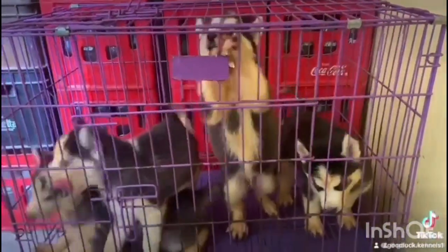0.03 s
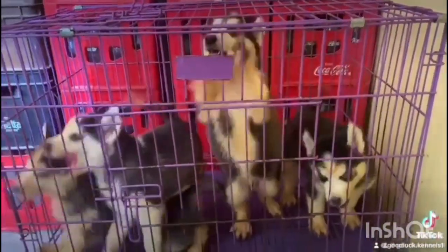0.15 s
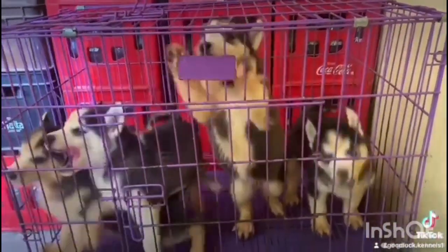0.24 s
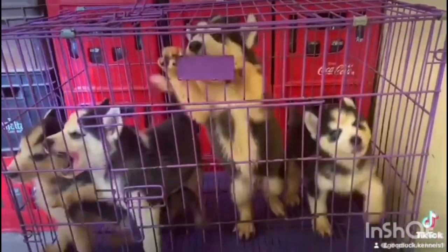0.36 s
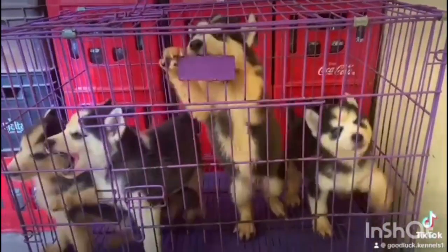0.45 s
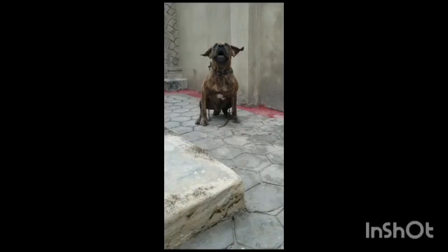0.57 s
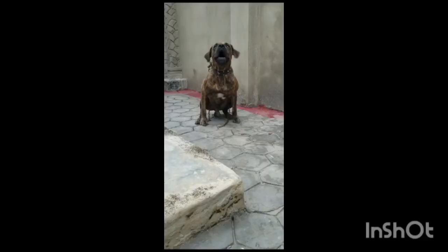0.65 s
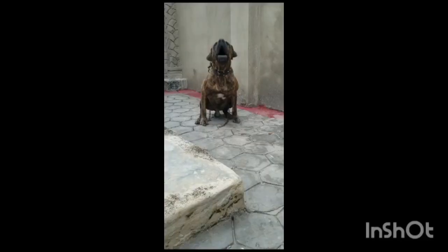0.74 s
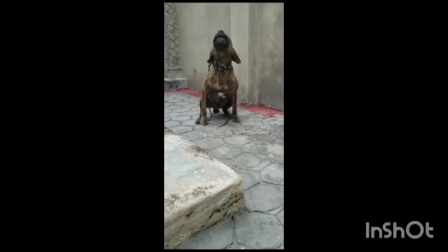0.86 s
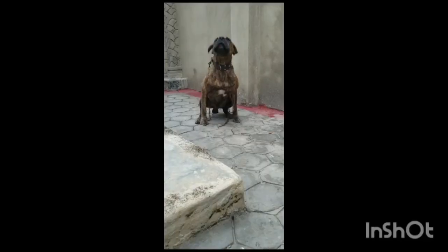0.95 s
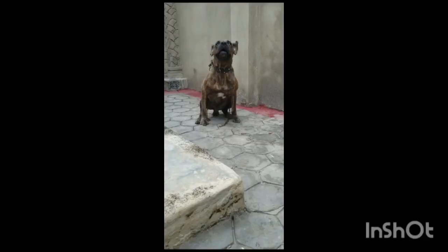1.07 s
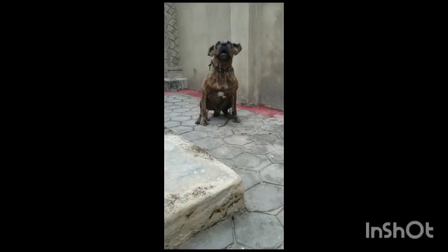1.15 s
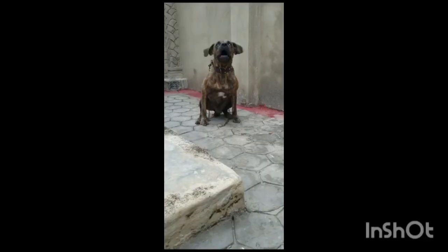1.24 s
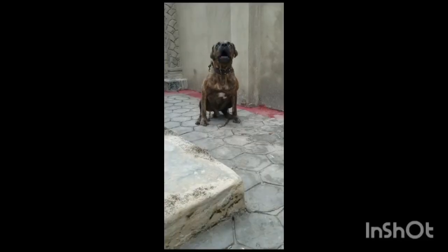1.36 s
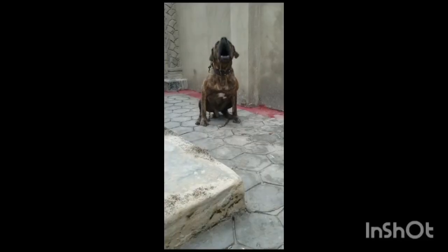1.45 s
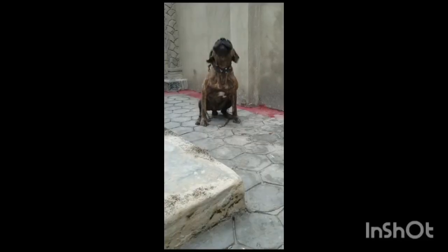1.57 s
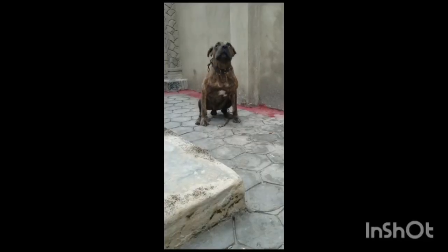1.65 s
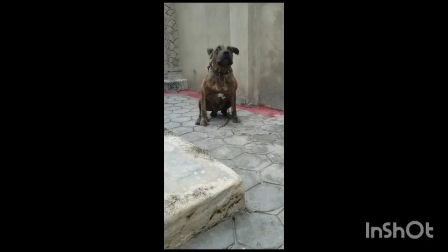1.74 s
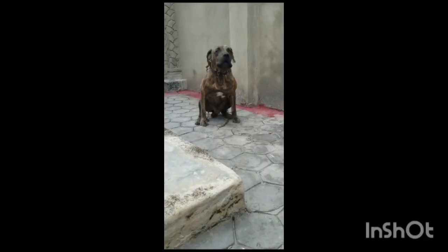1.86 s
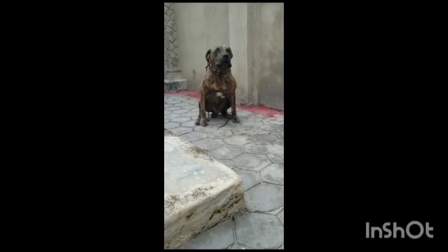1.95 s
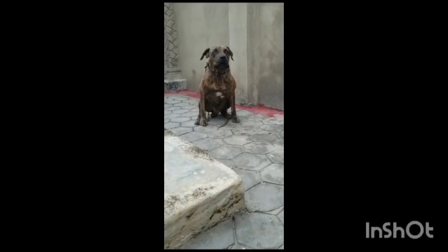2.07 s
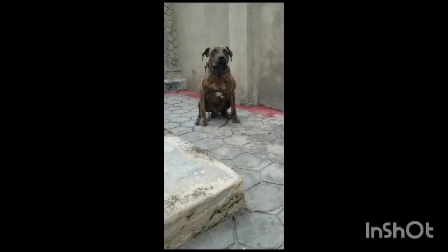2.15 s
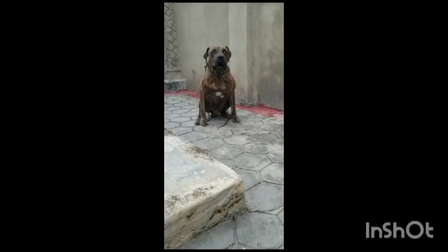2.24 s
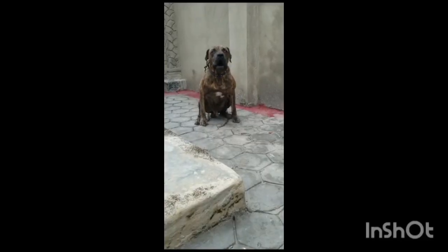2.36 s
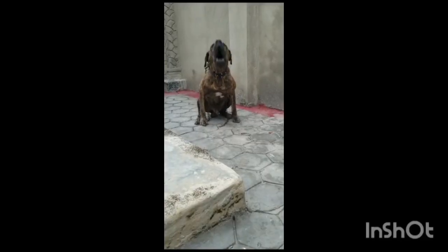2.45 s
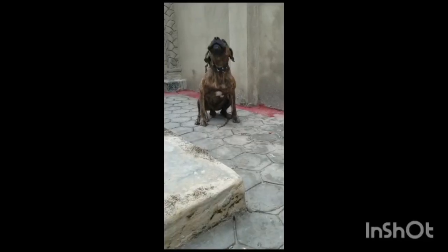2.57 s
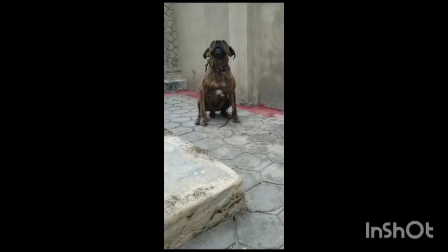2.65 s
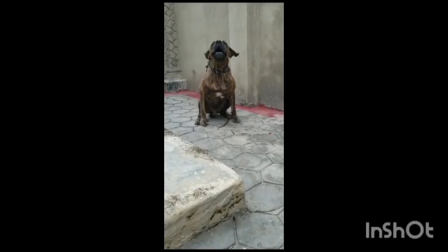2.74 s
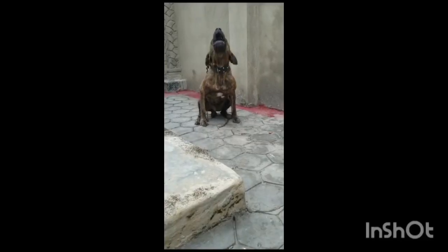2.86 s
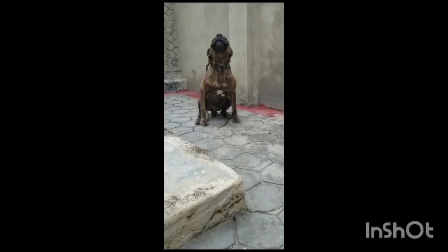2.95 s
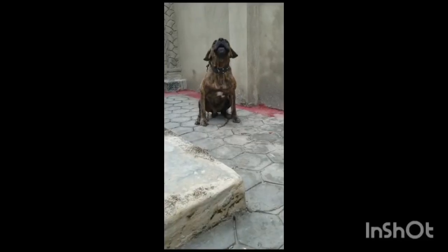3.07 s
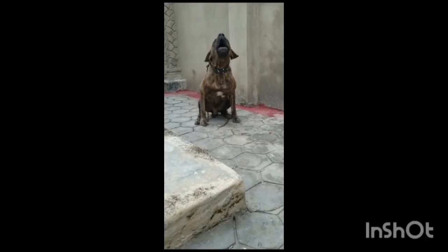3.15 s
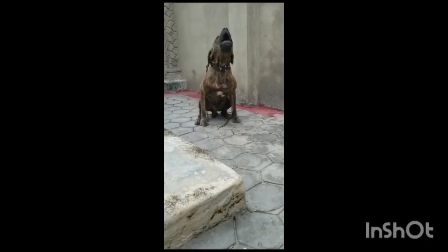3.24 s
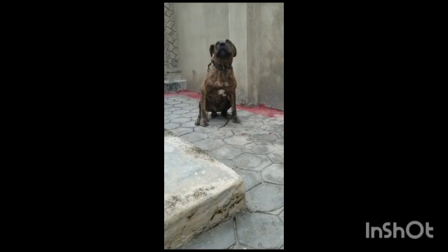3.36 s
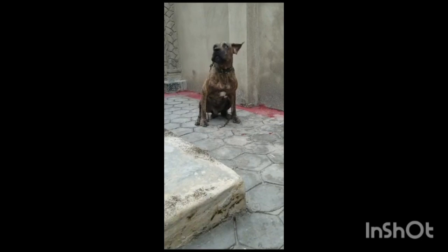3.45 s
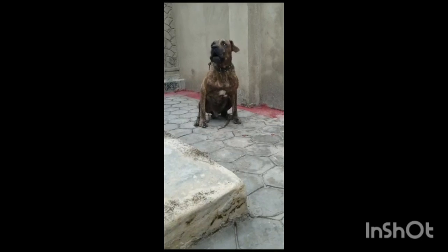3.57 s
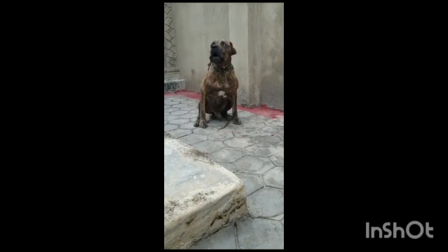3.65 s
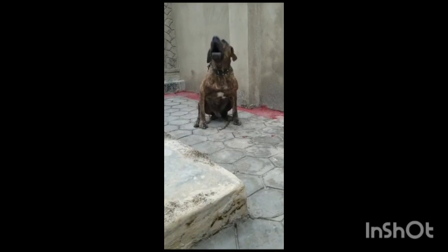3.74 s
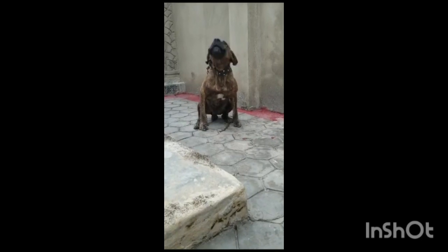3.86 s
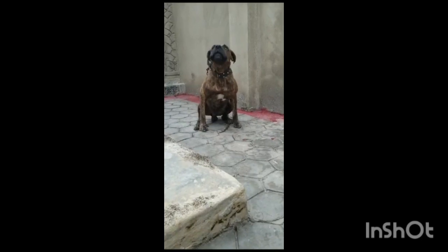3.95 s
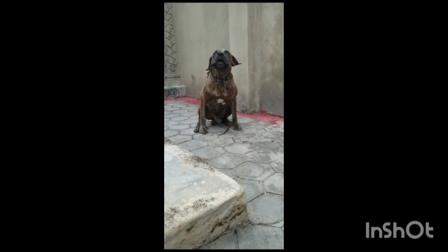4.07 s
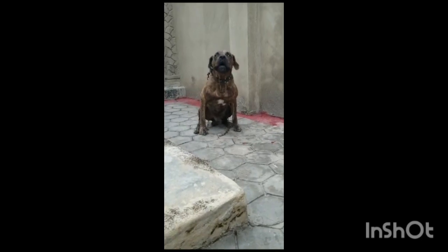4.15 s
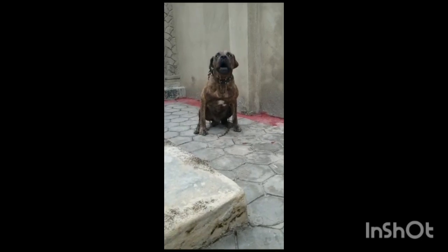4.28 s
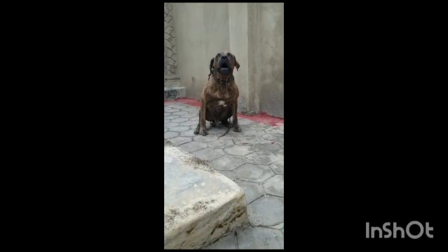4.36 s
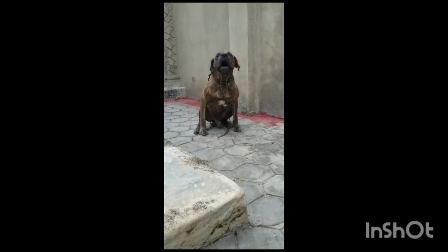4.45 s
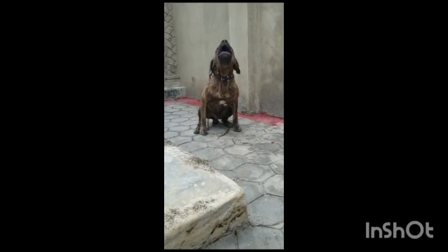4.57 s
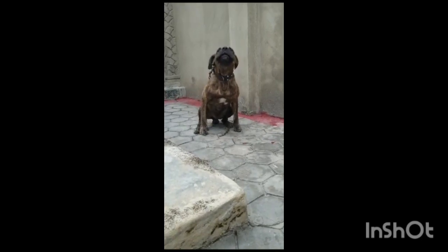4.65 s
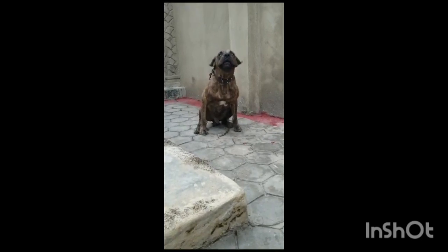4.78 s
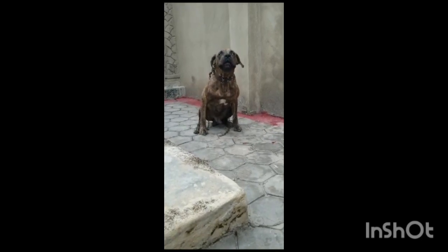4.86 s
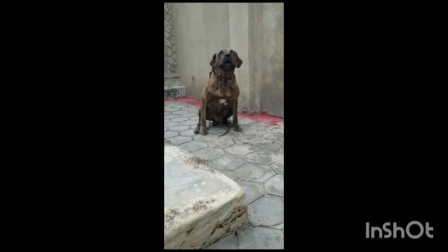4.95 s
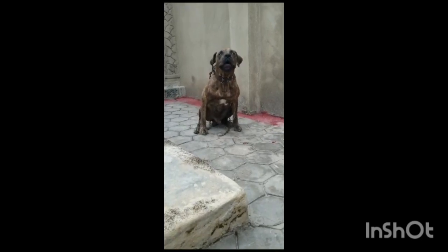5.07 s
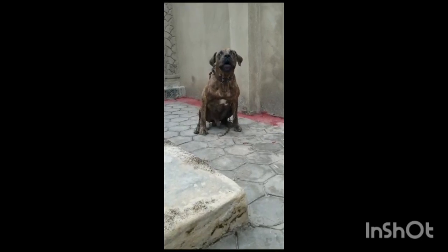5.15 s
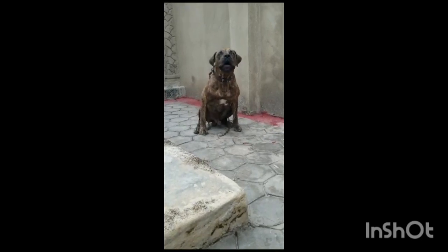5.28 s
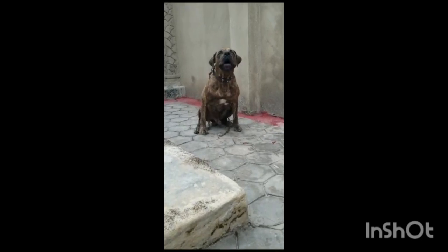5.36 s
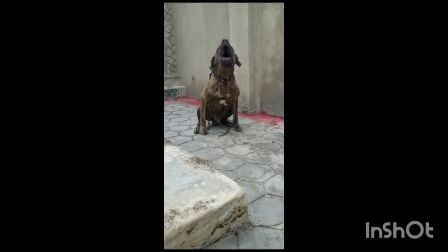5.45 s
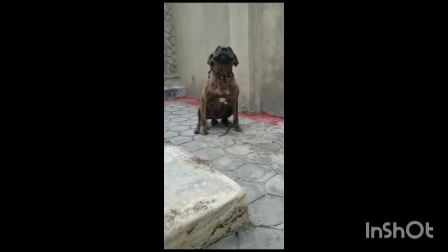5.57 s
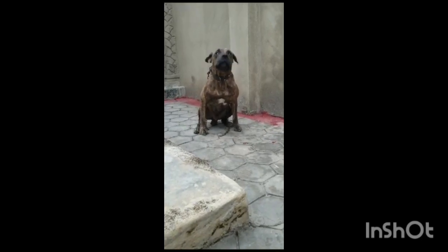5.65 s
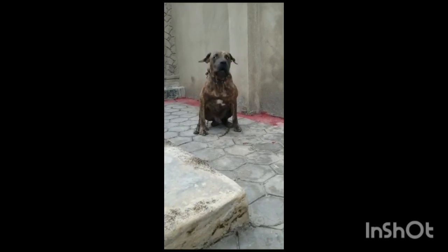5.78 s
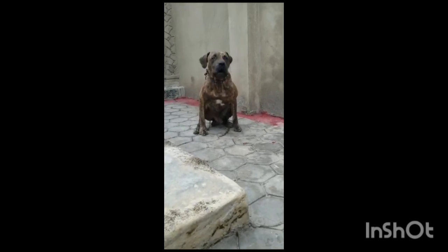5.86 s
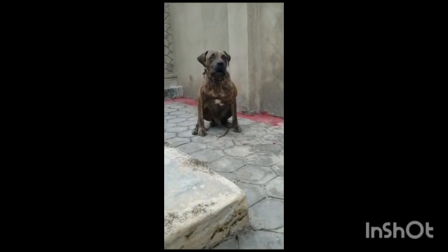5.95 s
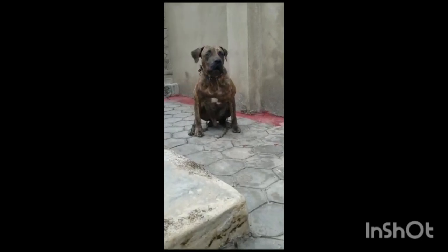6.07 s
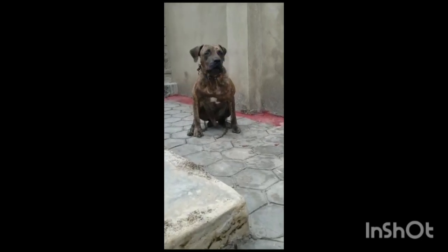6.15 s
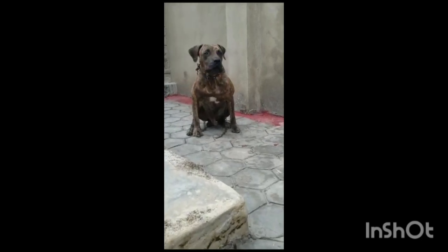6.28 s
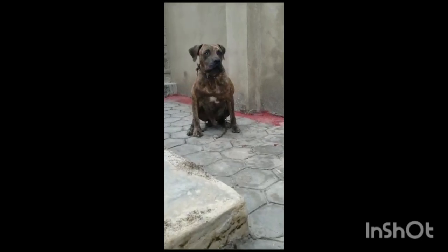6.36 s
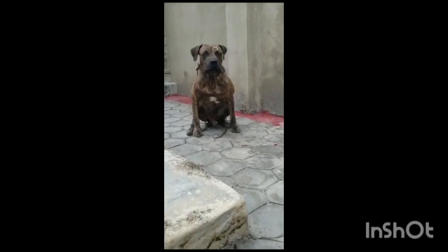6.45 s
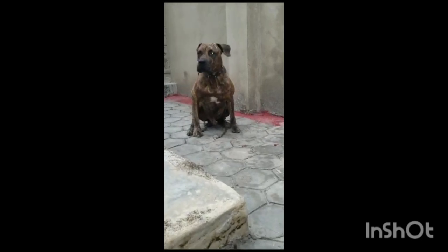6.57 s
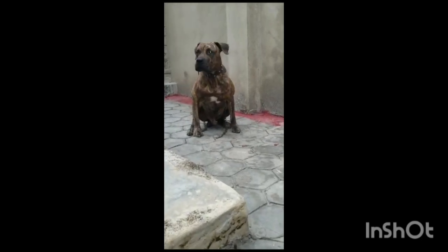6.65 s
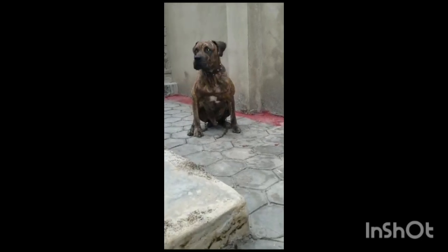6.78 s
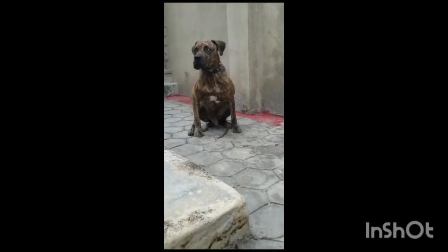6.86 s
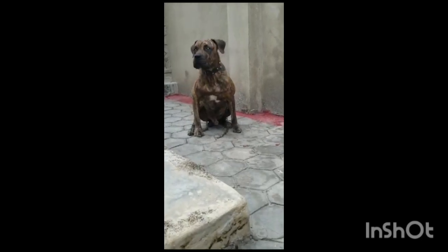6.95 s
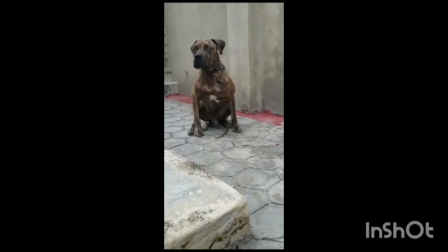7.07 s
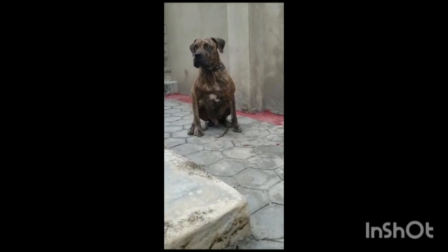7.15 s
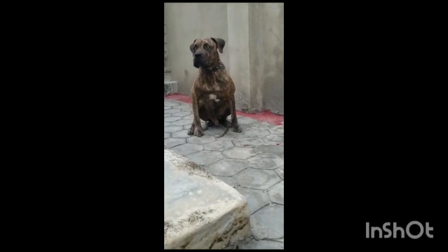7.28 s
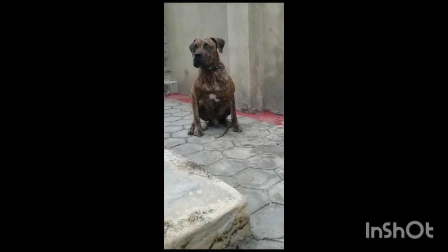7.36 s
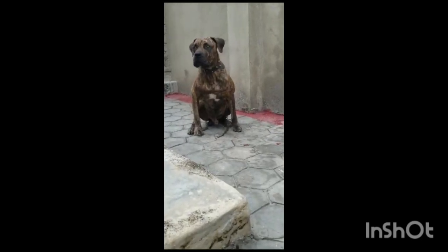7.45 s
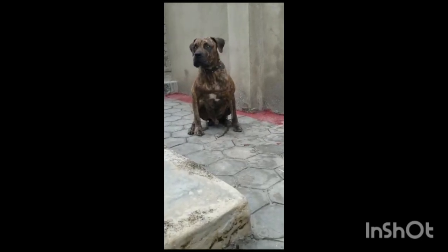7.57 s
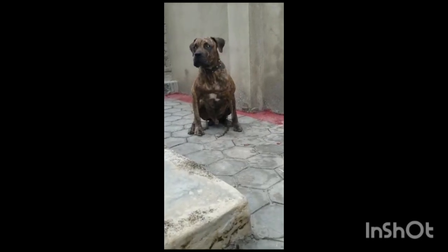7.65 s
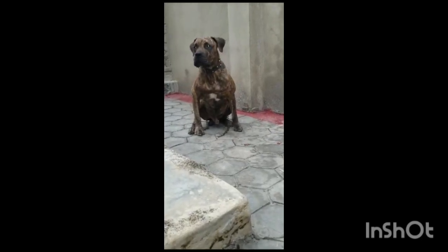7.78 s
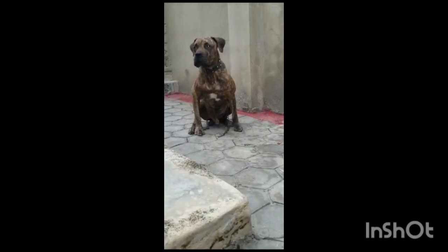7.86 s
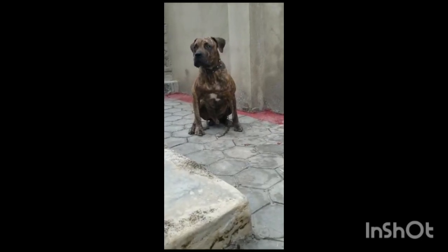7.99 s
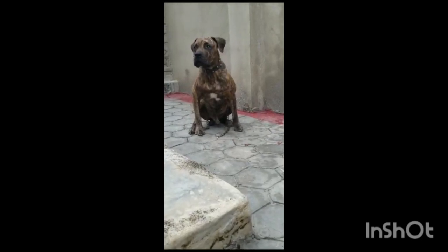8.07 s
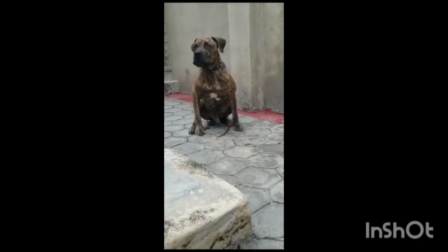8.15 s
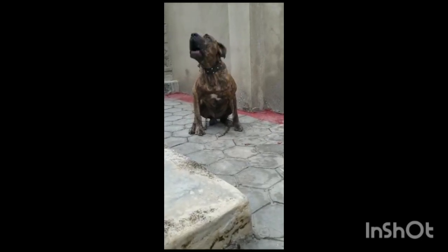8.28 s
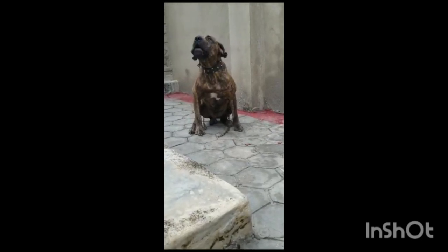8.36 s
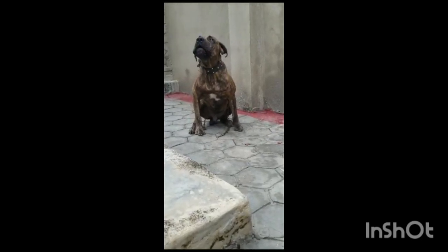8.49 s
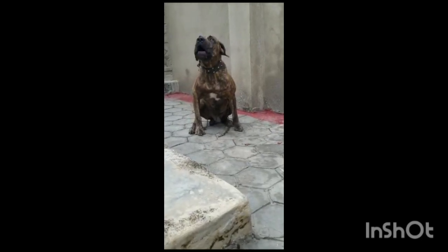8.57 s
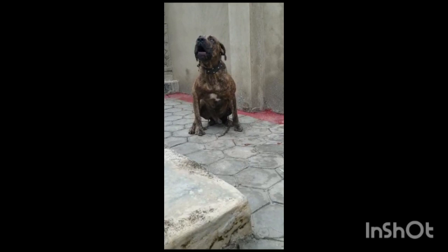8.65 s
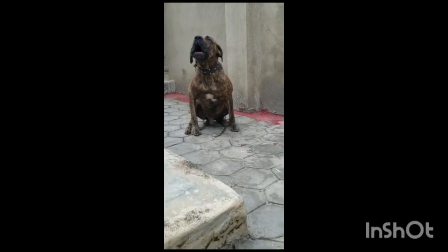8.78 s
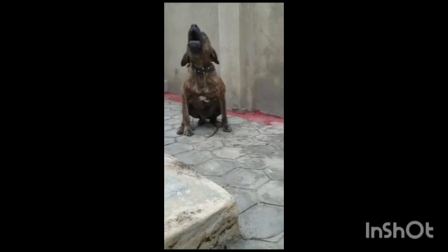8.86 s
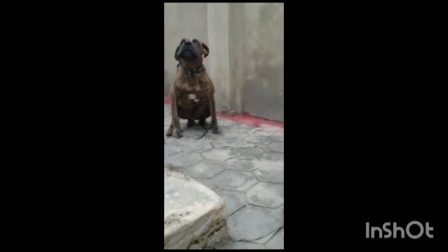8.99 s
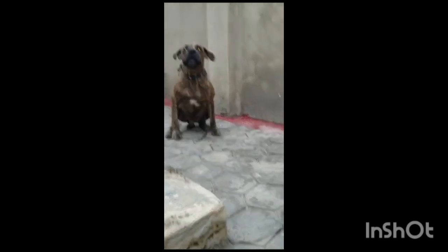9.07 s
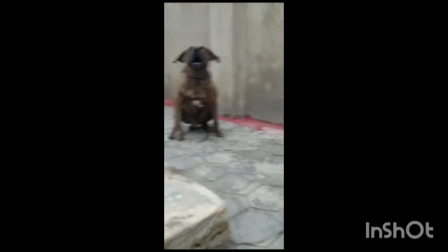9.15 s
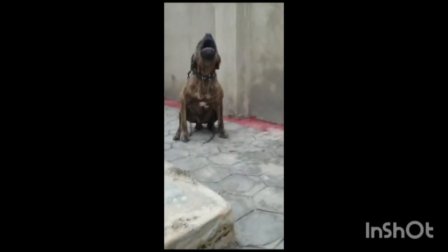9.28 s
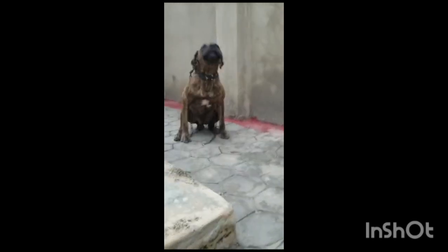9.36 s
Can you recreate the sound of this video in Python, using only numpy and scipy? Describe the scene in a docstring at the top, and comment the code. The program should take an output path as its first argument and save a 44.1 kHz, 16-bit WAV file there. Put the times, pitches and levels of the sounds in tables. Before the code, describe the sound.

After brief silence, one large dog barks hoarsely in a walled paved yard, whimpers and grumbles softly mid-way, then barks again in a quick pair.

```python
"""A large dog gives hoarse barks, singly and in a quick run: rough fold pulses ring throat, mouth and muzzle.
Between them it whimpers, whines and grumbles softly through an almost closed mouth.
A paved, walled yard answers with wall modes and noise decays; the loudest barks overload the microphone.
Behind lie faint whistles (gliding sines), clinks and a tick (noise bursts), air hiss and a low rumble.
The first 0.55 s is silent; the sound then starts abruptly."""
import sys
import numpy as np
from scipy import signal
from scipy.fft import rfft, irfft, next_fast_len
from scipy.io import wavfile
from scipy.ndimage import uniform_filter1d, map_coordinates

SR = 44100
rng = np.random.default_rng(int(sys.argv[2]) if len(sys.argv) > 2 else 0)


def generate_wav(sig):
    """Save sig (samples, or channels by samples) to the path in sys.argv[1] as 16-bit PCM at SR."""
    pcm = np.round(np.clip(np.atleast_2d(sig).T, -1, 1) * 32767).astype(np.int16)
    wavfile.write(sys.argv[1], SR, pcm)


N = 415422


def amp(db):
    """Decibels to gain."""
    return 10 ** (np.asarray(db) / 20)


def unit(x):
    """Scale to rms 1."""
    return x / np.sqrt(np.mean(x ** 2) + 1e-20)


def along(points, hz):
    """(frequency [Hz], value) points read on a log frequency axis."""
    f, v = np.transpose(points)
    return np.interp(np.log(hz + 1), np.log(f + 1), v)


def wobble(n, rate_hz):
    """Smooth random curve with rate_hz knots a second."""
    return map_coordinates(rng.standard_normal(int(n * rate_hz / SR) + 4), [np.arange(n) * rate_hz / SR])


def ripple(hz, spacing_hz):
    """Smooth random curve over frequency, drawn anew at each use."""
    return map_coordinates(rng.standard_normal(200), [hz / spacing_hz], mode="mirror")


def filtered(x, response):
    """x times a complex response of frequency."""
    n = x.shape[-1]
    m = next_fast_len(n + 8192)
    return irfft(rfft(x, m) * response(np.fft.rfftfreq(m, 1 / SR)), m)[..., :n]


def resonance(f, hz, width_hz):
    """Causal response of one resonance."""
    return 1j * f * width_hz / (hz * hz - f * f + 1j * f * width_hz)


def moving_resonance(x, hz, width_hz):
    """Double pole whose centre follows the curve hz: shift down, low-pass, shift back up."""
    turn = np.exp(2j * np.pi * np.cumsum(hz) / SR)
    pole = np.exp(-np.pi * width_hz / SR)
    return (signal.lfilter([1], np.poly([pole, pole]), x / turn) * turn).real


def steady(x, seconds=0.023):
    """Hold the running rms near 1 while keeping the fast grain."""
    return x / np.sqrt(np.abs(uniform_filter1d(x * x, int(seconds * SR) + 1)) + 1e-20)


def add(track, first, x):
    """Mix x into the track from sample first."""
    track[first:first + len(x)] += x[:len(track) - first]


def air():
    """Faint outdoor hiss and a low rumble that swells late: shaped noise, independent left and right."""
    # (frequency [Hz], relative density [dB])
    air_colour = [(30, -6.5), (90, 0.5), (200, -7), (500, -5), (1000, -12.5), (2000, -23.5), (3200, -16),
                  (4200, -20), (5700, -11), (7300, -29), (13000, -30), (15500, -29.5)]
    # (time [s], level [dB])
    air_level = [(.55, -58.5), (2.2, -67.5), (6.3, -66.5), (7.0, -62.5), (8.1, -63), (9.4, -62.5)]
    # (time [s], level [dB])
    rumble_level = [(.55, -80), (7.2, -79.5), (7.65, -73), (7.9, -65), (8.1, -55), (8.7, -66), (9.4, -55)]
    t = np.arange(N) / SR
    hiss = unit(filtered(rng.standard_normal((2, N)), lambda f: amp(along(air_colour, f))))
    rumble = unit(filtered(rng.standard_normal((2, N)), lambda f: resonance(f, 170, 150) ** 2))
    hiss_gain = amp(np.interp(t, *np.transpose(air_level)))
    rumble_gain = amp(np.interp(t, *np.transpose(rumble_level)))
    return hiss * hiss_gain + rumble * rumble_gain


def whistles():
    """Thin faint glides, slightly wavering: a sine and its octave under a Hann swell."""
    # (time [s], length [s], start [Hz], end [Hz], level [dB], octave re level [dB])
    whistle_rows = [(1.877, 0.2, 3390, 3340, -72.5, 3.5), (2.331, 0.1, 3450, 3110, -65, -13.5),
                    (3.572, 0.21, 3730, 2820, -62.5, -11.5), (4.185, 0.36, 1725, 1600, -65, -16.5),
                    (7.058, 0.15, 2820, 2930, -72, -4.5), (7.26, .24, 3120, 3105, -73, -12)]
    track = np.zeros(N)
    for s, length_s, start_hz, end_hz, db, octave_db in whistle_rows:
        n = int(length_s * SR)
        glide_hz = end_hz + (start_hz - end_hz) * np.linspace(1, 0, n) ** 2
        phase = 2 * np.pi * np.cumsum(glide_hz * (1 + 0.0036 * wobble(n, 24))) / SR
        tone = np.sin(phase) + amp(octave_db) * np.sin(2 * phase)
        add(track, int(s * SR), amp(db) * np.hanning(n) * tone)
    return track


def clinks():
    """Tiny high rattles, like a collar fitting: noise in one narrow band, decaying exponentially."""
    # (time [s], level before the envelope [dB], centre [Hz])
    clink_rows = [(1.1099, -63.5, 11310), (3.112, -55, 11180), (4.479, -34.5, 10240), (8.496, -72, 10900),
                  (9.1147, -57, 11060)]
    track, t = np.zeros(N), np.arange(SR // 8) / SR
    envelope = (1 - np.exp(-t / 0.0034)) * np.exp(-t / 0.034)
    for s, db, hz in clink_rows:
        ring = unit(filtered(rng.standard_normal(len(t)), lambda f: resonance(f, hz, 1200) ** 2))
        add(track, int(s * SR), amp(db) * ring * envelope)
    return track


def tick():
    """Soft dull tick: a noise burst with a 2 ms decay and no ring."""
    # (time [s], peak [dB])
    tick_rows = [(7.935, -30.5)]
    # (frequency [Hz], relative gain [dB])
    tick_colour = [(40, 13.5), (150, 6.5), (500, -4), (2000, -17), (5500, -19), (8000, -43)]
    track, t = np.zeros(N), np.arange(SR // 20) / SR
    for s, db in tick_rows:
        noise = rng.standard_normal(len(t)) * np.exp(-t / 0.0021)
        burst = filtered(noise, lambda f: amp(along(tick_colour, f)))
        add(track, int(s * SR), amp(db) * burst / np.abs(burst).max())
    return track


def tail(t60_scale, delay_s, uneven_db):
    """Mid and side noise decay in clumps of echoes; each frequency dies at its own speed."""
    # (frequency [Hz], decay time t60 before t60_scale [s])
    yard_t60 = [(100, 1), (250, 1), (500, 0.62), (1000, 0.74), (2000, 0.8), (3000, 0.49), (5000, 0.5),
                (8000, 0.79), (14000, 0.77)]
    hz, t, z = signal.stft(rng.standard_normal((2, SR)), SR, nperseg=256)
    t60_s = t60_scale * along(yard_t60, hz)[:, None]
    ir = signal.istft(z * amp(-60 * t / t60_s), SR, nperseg=256)[1][:, :SR]
    ir = ir * amp(uneven_db * wobble(SR, 35))
    # unit mean energy density over the 1 kHz wide voice band
    voiced = filtered(ir, lambda f: (f > 400) & (f < 1400))
    energy = np.sum(voiced ** 2, axis=1, keepdims=True) * SR / 2000
    return np.pad(ir / np.sqrt(energy), ((0, 0), (int(delay_s * SR), 0)))[:, :SR]


def yard(dog, lead_s, near_db, far_db):
    """Direct sound, left ahead by lead_s; near walls answer fast, far ones later, longer and recoloured."""
    # resonances between the walls: (frequency [Hz], width [Hz], gain [dB])
    wall_modes = [(486, 19, -4.5), (594.3, 83, 3.5), (796, 14, -9), (856, 30, -14), (1017, 14, -12),
                  (1157, 110, 7), (1308, 37, -9.5), (1820, 91, -12)]
    # far answer: (frequency [Hz], gain [dB])
    yard_colour = [(100, 3), (300, 5.5), (1500, -5.5), (3000, -1), (5200, 1.5), (7500, -16), (11000, -5.5),
                   (14000, -15)]
    direct = filtered(dog, lambda f: np.exp(1j * np.pi * f * lead_s * np.array([[1], [-1]])))
    ringing = filtered(dog, lambda f: 1 + sum(amp(db) * resonance(f, hz, width_hz)
                                              for hz, width_hz, db in wall_modes))
    near = tail(t60_scale=.17, delay_s=0.002026, uneven_db=4.0)
    far = filtered(tail(t60_scale=0.85, delay_s=.02, uneven_db=4.5), lambda f: amp(along(yard_colour, f)))
    answer = amp(near_db) * near + amp(far_db) * far
    mid, side = signal.fftconvolve(ringing[None], answer, axes=1)[:, :N]
    # long waves are more alike in both channels
    side = filtered(side, lambda f: amp(along([(300, -8.5), (700, -9.5), (1500, -0.5)], f)))
    return direct + np.array([mid + side, mid - side]) / np.sqrt(2)


def call(s, length_s, attack_s, release_s):
    """First sample, on-off gate, time since the start and progress (0-1) of one call."""
    t = np.arange(int((length_s + .14) * SR)) / SR - attack_s
    gate = np.clip(1 + t / attack_s, 0, 1) ** 2 * np.exp(-np.maximum(t - length_s, 0) / release_s)
    t = np.clip(t, 0, length_s)
    return int((s - attack_s) * SR), gate, t, t / length_s


def folds(pitch_hz, jitter, doubling, tripling, rough, count=12):
    """Vocal fold pulses, uneven over every two and three cycles; air bursts through once a cycle."""
    n = len(pitch_hz)
    phase = 2 * np.pi * np.cumsum(pitch_hz * (1 + jitter * wobble(n, 220.9))) / SR
    pulses = unit(sum(np.cos(k * phase) for k in range(1, count + 1)))
    uneven = 1 + doubling * np.cos(phase / 2) + tripling * np.cos(phase / 3)
    breath = unit(rng.standard_normal(n) * (1 + np.cos(phase) / 2))
    share = np.clip(rough, 0, 1)
    return uneven * (np.sqrt(1 - share) * pulses + np.sqrt(share) * breath)


def soft_voice(pitch_hz, push_db, low_db, nasal_db, jitter, rough, flutter_db):
    """Dull voice through an almost closed mouth; its loudness flutters some forty times a second."""
    n = len(pitch_hz)
    source = folds(pitch_hz, jitter=jitter, doubling=rough, tripling=rough / 2, rough=rough / 2)
    source = filtered(source, lambda f: 1 / np.sqrt(1 + (f / 2100) ** 12))
    low = steady(filtered(source, lambda f: resonance(f, 430, 270) ** 3))
    octave = steady(moving_resonance(source, 2 * pitch_hz, width_hz=330))
    nasal = steady(filtered(source, lambda f: resonance(f, 1384, 330) ** 3
                            + amp(-7.5) * resonance(f, 1964, 300) ** 3))
    flutter = np.sin(2 * np.pi * np.cumsum(41 + 6 * wobble(n, 18)) / SR)
    # the rougher the call, the more turbulence rings the half-closed mouth
    husk = rough * steady(filtered(rng.standard_normal(n), lambda f: resonance(f, 900, 530) ** 3))
    voice = amp(low_db) * low + amp(-6.0) * octave + amp(nasal_db) * nasal + husk
    return amp(push_db + flutter_db * flutter) * voice


def arched_call(row, jitter, rough, flutter_db):
    """Whimper or whine: loudness climbs to a rounded top and falls; pitch moves through three points."""
    s, rise_s, fall_s, start_hz, top_hz, end_hz, db, low_db, nasal_db = row
    swell_db = 12  # both ends below the top
    first, gate, t, _ = call(s, rise_s + fall_s, attack_s=.016, release_s=.015)
    slack = np.interp(t, [0, rise_s, rise_s + fall_s], [1, 0, 1]) ** 1.6
    pitch_hz = top_hz + slack * (np.where(t < rise_s, start_hz, end_hz) - top_hz)
    voice = soft_voice(pitch_hz, -swell_db * slack, low_db, nasal_db, jitter, rough, flutter_db)
    return first, gate * amp(db) * voice


def grumble(row, jitter, rough, flutter_db):
    """The voice breaks upward, drops back, then sinks and fades."""
    s, length_s, db, low_db, nasal_db = row
    start_hz, end_hz, break_hz, break_s, fade_db = 456, 354.7, 80.3, 0.01805, 21.5
    first, gate, t, progress = call(s, length_s, attack_s=0.011, release_s=0.025)
    pitch_hz = start_hz + (end_hz - start_hz) * progress + break_hz * np.exp(-t / break_s)
    voice = soft_voice(pitch_hz, -fade_db * progress, low_db, nasal_db, jitter, rough, flutter_db)
    return first, gate * amp(db) * voice


def whimpers():
    """Thin clean whines, husky whimpers and rough falling grumbles: one soft voice, three roughnesses."""
    # (time [s], rise [s], fall [s], start [Hz], top [Hz], end [Hz], level [dB],
    #  fundamental re level [dB], nasal overtones re level [dB])
    whine_rows = [ (4.84, .033, 0.047, 690, 745.4, 782, -36.5, -6.5, -5.5),
                  (7.466, 0.034, 0.06, 425, 397, 388, -52, -14, -26.5),
                  (7.79, 0.11, 0.047, 278, 319.3, 320, -49, -29, -17.5),
                  (7.949, .045, 0.0674, 336, 363, 345, -40.5, -11, 0.5)]
    # columns as for the whines
    whimper_rows = [ (1.145, 0.031, 0.037, 455, 509, 550, -32, -4.5, -15),
                    (1.2, 0.028, 0.03, 631, 671, 673.5, -34.5, -10.5, -8),
                    (5.246, .04, 0.031, 499.7, 737, 756, -26.5, -11.5, -11.5),
                    (5.836, 0.017, 0.029, 498, 543, 488, -38.5, -1.5, -17),
                    (6.0, .088, .095, 387.6, 498, 404, -39.5, -3, -10.5),
                    (6.23, 0.0666, 0.026, 369, 475.5, 454, -38, -4, -15),
                    (6.489, 0.057, 0.061, 397.2, 462, 458, -36.5, -5, -8),
                    (6.74, 0.0706, 0.018, 351.7, 459, 465, -31, -5, -13)]
    # (time [s], length [s], level [dB], fundamental re level [dB], nasal overtones re level [dB])
    grumble_rows = [(6.343, .085, -34.5, -4, -9.5), (6.605, 0.097, -37, -2, -7.5),
                    (6.841, .17, -34, -0.5, -8.5)]
    track = np.zeros(N)
    for row in whine_rows:
        add(track, *arched_call(row, jitter=.006, rough=.05, flutter_db=.5))
    for row in whimper_rows:
        add(track, *arched_call(row, jitter=.016, rough=.22, flutter_db=2))
    for row in grumble_rows:
        add(track, *grumble(row, jitter=.02, rough=.28, flutter_db=3.5))
    return track


def hiss_colour(f, sizzle_db):
    """Gain of the air past the teeth, with narrow resonances that fall anew each time."""
    # (frequency [Hz], relative gain [dB])
    teeth_colour = [(1410, -20.5), (2400, -12), (3200, -7), (3600, -3.5), (4210, -9.5), (5110, -9.5),
                    (6070, -12.5), (6760, -18.5), (7600, -17.5), (9990, -17.5), (13400, -20.5),
                    (15400, -23.5)]
    uneven_db = 3.5 * ripple(f, 380)
    return amp(along(teeth_colour, f) + along([(5500, 0.0029), (8500, sizzle_db)], f) + uneven_db)


def teeth_hiss(pitch_hz, progress, sizzle_db):
    """Breathy pulses hiss past lips and teeth, crossfading from an early to a late, duller colour."""
    sizzle_sag_db = 9
    breathy = folds(pitch_hz, jitter=.06, doubling=.35, tripling=.4, rough=.94)
    early = unit(filtered(breathy, lambda f: hiss_colour(f, sizzle_db + sizzle_sag_db / 2)))
    late = unit(filtered(breathy, lambda f: hiss_colour(f, sizzle_db - sizzle_sag_db / 2)))
    return unit((1 - progress) * early + progress * late) * amp(3.3 * wobble(len(progress), 70))


def bark(s, length_s, swell_s, db, throat_hz, mouth_start_hz, mouth_end_hz,
         throat_db, bright_db, hiss_db, sizzle_db):
    """Rough pulses ring the throat, the moving mouth and the muzzle; air hisses past the teeth."""
    # muzzle: (frequency [Hz], relative gain [dB])
    muzzle_colour = [(590, -25.5), (1000, 4.5), (1390, -1), (1490, -8.5), (1630, -5), (1880, -15.5),
                     (2120, -10), (3200, -33.5), (4160, -59), (7040, -120)]
    onset_db, hold_share, fade_db = 19, 0.74, 6  # push of air: weak start, held share of length, final drop
    throat_follows, bright_follows = 0.65, .85  # share of the push; the throat sounds even nearly shut
    hiss_onset_db, hiss_fade_db = 11.5, 11
    throat_sag_db, bright_sag_db = 5.5, 3  # loss from start to end
    muzzle_start_hz, muzzle_end_hz, muzzle_hz_per_db = 1968, 1584, 45  # brighter bark, higher centre

    first, gate, t, progress = call(s, length_s, attack_s=.005, release_s=0.0051)
    n = len(gate)
    opening = np.maximum(1 - t / swell_s, 0) ** 2
    closing = np.maximum(progress - hold_share, 0) / (1 - hold_share)
    push_db = -onset_db * opening - fade_db * closing

    pitch_hz = 1.08 * throat_hz * (1 - .13 * (2 * progress - .9) ** 2)  # arched
    source = folds(pitch_hz, jitter=.05, doubling=.7, tripling=.6, rough=.55)
    source = filtered(source, lambda f: 1 / np.sqrt(1 + (375 / (f + 1)) ** 10))
    throat = steady(moving_resonance(source, throat_hz * (1 + .06 * wobble(n, 40)), width_hz=157))

    mouth_hz = mouth_start_hz + (mouth_end_hz - mouth_start_hz) * progress ** 1.6  # moves late
    # the folds partly lock on to the mouth resonance and sing with it
    locked_phase = 2 * np.pi * np.cumsum(mouth_hz * (1 + .035 * wobble(n, 160))) / SR
    mouth = steady(moving_resonance(source, mouth_hz, width_hz=420))
    mouth = steady(mouth + .85 * np.sin(locked_phase))

    muzzle = filtered(source, lambda f: amp(along(muzzle_colour, f) + 3.5 * ripple(f, 130)))
    muzzle_hz = muzzle_start_hz + (muzzle_end_hz - muzzle_start_hz) * progress + muzzle_hz_per_db * bright_db
    muzzle = steady(moving_resonance(muzzle, muzzle_hz, width_hz=884))

    hiss = teeth_hiss(pitch_hz, progress, sizzle_db)
    lateness = progress - .5
    throat_gain_db = throat_db + throat_follows * push_db - throat_sag_db * lateness + 2.4 * wobble(n, 45)
    muzzle_gain_db = bright_db + bright_follows * push_db - bright_sag_db * lateness
    hiss_gain_db = hiss_db - hiss_onset_db * opening - hiss_fade_db * closing
    voice = (amp(push_db) * mouth + amp(throat_gain_db) * throat
             + amp(muzzle_gain_db) * muzzle + amp(hiss_gain_db) * hiss)
    return first, gate * amp(db) * voice


def barks():
    """All barks on one track; of the first only the echo is heard, the two at 8.2 s run together."""
    # (time [s], length [s], swell [s], level [dB], throat [Hz], mouth start [Hz], mouth end [Hz],
    #  throat re level [dB], bright re level [dB], hiss re level [dB], sizzle: hiss gain from 8.5 kHz up [dB])
    bark_rows = [ (0.182, 0.12, .04, 0, 503, 690, 850, -6, -5, -21.5, -1),
                 (0.76, 0.14, .025, -8, 500.6, 619.7, 873, -6.5, -6, -24.5, -2.5),
                 (1.442, 0.11, .048, -9, 510.1, 678.4, 951, -5.5, -5, -26.5, 2),
                 (2.416, .13, .042, -9, 459.7, 700, 902, -5.5, -9, -26.5, 3.5),
                 (2.774, 0.14, 0.058, -7, 483.3, 730, 813.7, -6, -6.5, -27, 0.5),
                 (3.136, 0.14, .05, -8.5, 481.8, 660, 720.7, -2.5, -7.5, -28.5, 2.5),
                 (3.74, .124, 0.071, -7.5, 462, 680.3, 764.5, -3, -7.5, -28.5, 2),
                 (4.467, 0.13, 0.065, -6.5, 468.2, 670, 805, -7.5, -9.5, -30, 3),
                 (5.39, .138, .05, -9, 485.8, 790, 883.5, -3.5, -2.5, -24.5, 2.5),
                 (8.155, 0.077, 0.037, -8, 522.5, 663, 899, -9, -1, -16.5, -6),
                 (8.237, .088, 0.0089, -11.5, 510, 1085, 1002, -2.5, 1.5, -16, -5),
                 (8.803, 0.12, 0.058, -8.5, 451.8, 730, 763.7, -7, -8, -25.5, -2.5),
                 (9.154, 0.13, .055, -9, 462.8, 840, 781, -6, -5, -27, 2)]
    track = np.zeros(N)
    for row in bark_rows:
        add(track, *bark(*row))
    return track


def scene():
    """The dog in its yard, louder on the right except in the top treble, over the faint background."""
    # (frequency [Hz], left minus right [dB])
    balance = [(100, -8.5), (450, -4.5), (750, -3.5), (1400, -4.5),
               (2800, -3.5), (5500, -7.5), (9000, -2.5), (14000, 2.0)]
    loud = yard(barks(), lead_s=.00018, near_db=-2.0, far_db=-7.5)
    soft = yard(whimpers(), lead_s=-0.00014, near_db=-2.0, far_db=-4.5)
    dog = filtered(loud + soft, lambda f: amp(along(balance, f) * np.array([[.5], [-.5]])))
    return dog + whistles() + clinks() + tick() + air()


def record(dry):
    """Microphone overload as a soft limit, a low thud from the fourth power, abrupt start, band limit."""
    top, hardness, start_s, top_hz = 1.02, 7, .551, 15650
    x = dry / (1 + np.abs(dry / top) ** hardness) ** (1 / hardness)
    thud = filtered(x ** 4, lambda f: resonance(f, 55, 170)) * np.array([[.014], [.035]])
    started = np.arange(N) / SR > start_s
    return filtered((x + thud) * started, lambda f: f < top_hz)


dry = scene()
out = record(dry)
generate_wav(out)
```